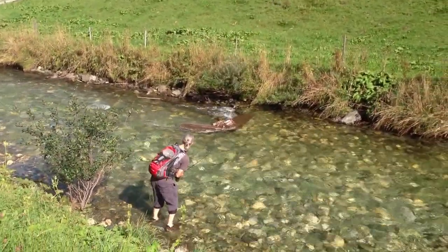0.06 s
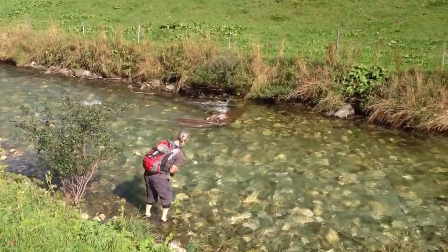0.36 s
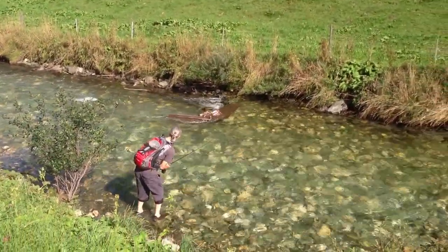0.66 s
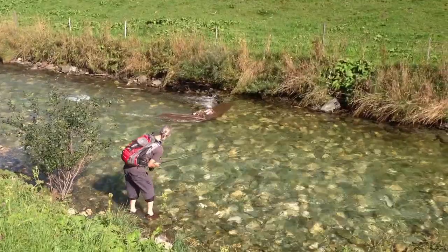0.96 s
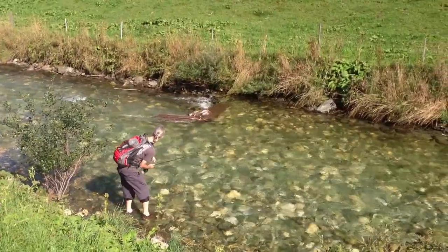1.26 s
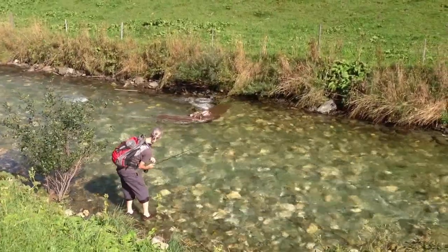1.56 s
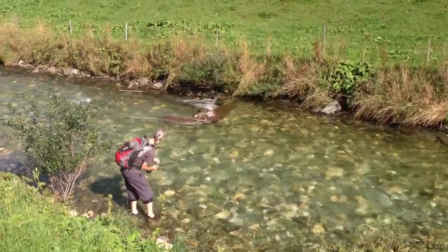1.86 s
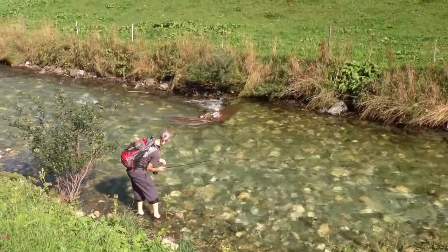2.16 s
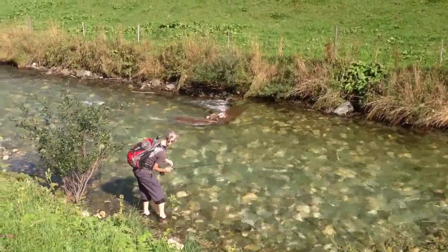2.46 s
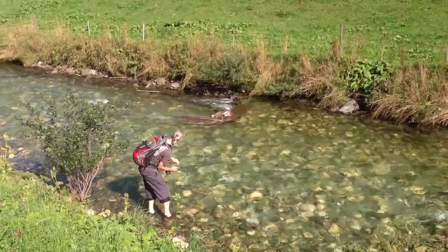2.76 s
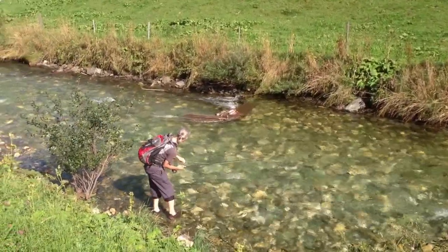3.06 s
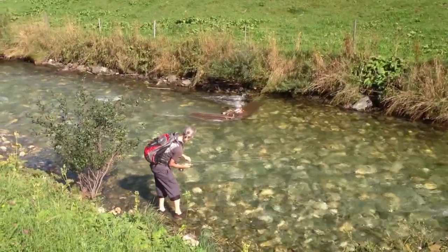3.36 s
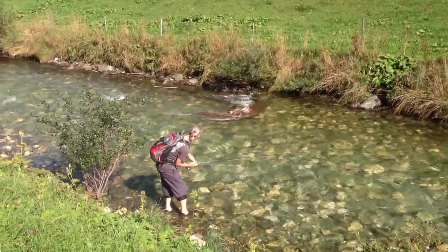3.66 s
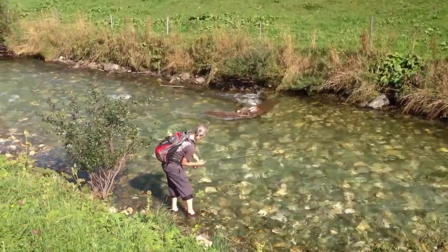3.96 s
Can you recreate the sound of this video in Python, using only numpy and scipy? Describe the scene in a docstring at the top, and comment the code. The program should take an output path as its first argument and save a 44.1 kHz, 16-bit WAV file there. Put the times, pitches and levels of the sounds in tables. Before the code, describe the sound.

A shallow, stony stream rushes steadily outdoors, with small gurgles, plinks and splashes. Just past the middle, the camera on the bank is handled, giving two sharp, close knocks and soft thumps. The water carries on, slightly duller.

```python
"""A shallow, stony stream rushes steadily, with a few gurgles, plinks and small splashes, in mono.
Countless tiny bubbles ring in churning water; the rush slowly dulls and its ringing band sinks.
Just past the middle, a camera on the bank is handled: two sharp knocks and soft thumps of its case.
A few faint ticks on the camera come before and after."""
import sys
import numpy as np
from scipy import signal
from scipy.fft import rfft, irfft
from scipy.io import wavfile

SR = 44100
rng = np.random.default_rng(int(sys.argv[2]) if len(sys.argv) > 2 else 0)


def master_out(mix):
    """Clip the mix to full scale and print it as 16-bit PCM to the path in sys.argv[1]."""
    frames = np.transpose(np.atleast_2d(mix))
    ceiling = np.clip(frames, -1, 1)
    pcm = np.round(ceiling * 32767).astype(np.int16)
    wavfile.write(sys.argv[1], SR, pcm)


N = 176400  # 4 seconds


def stream(wash_db=-4.5, bubbles_db=-8.5, flutter_db=0.38, flutter_s=0.017):
    """Churning water and bubbles flutter together and slowly dull, under a fading high fizz."""
    # three tone colours of the rush (frequency [Hz], level [dB])
    bright = [(20, -39), (50, -39), (75, -27), (113, -16.5), (165, -9), (250, -8), (330, -7), (490, -4.5),
              (720, -0.5), (960, -5), (1300, -3.5), (1900, -5), (2300, -3), (2800, -4.5), (3100, -7.5),
              (3550, -7.5), (4500, -12.5), (4800, -17), (5400, -17), (7200, -27.5), (8500, -29.5),
              (15000, -33.5)]
    mellow = [(20, -37), (70, -30.5), (165, -6), (310, -12.5), (500, -4), (730, -2), (950, -2),
              (1800, -2.5), (2830, -2.5), (3130, -10.5), (3600, -8), (4650, -12), (5900, -23), (8500, -29),
              (15000, -32.5)]
    dull = [(20, -47), (50, -34), (79, -23), (122, -15), (170, -8), (310, -7.5), (520, -4), (700, -1),
            (950, -5), (1700, -1.6), (2300, -1.5), (2600, -6.5), (2850, -3.5), (3130, -10.7), (3650, -10),
            (4400, -14), (5200, -16.5), (6100, -27.5), (8500, -28.5), (15000, -33.5)]
    # the path through them (time [s], stage [0 bright, 1 mellow, 2 dull])
    dulling = [(0, 0.4), (2.05, 0.029), (2.4, 1.05), (2.8, 0.82), (3.2, 1.7), (3.6, 1.9)]
    # loudness of the rush (time [s], level [dB])
    flow = [(0, -43), (.3, -42.5), (.9, -42), (1.4, -42.5), (2.1, -42), (2.45, -42), (2.9, -43),
            (3.12, -41), (3.35, -43.5), (3.5, -41), (3.65, -43), (4, -42)]
    water = amp(wash_db) * wash() + amp(bubbles_db) * bubbles()
    stage = np.clip(curve(dulling), 0, 2)
    rush = np.zeros(N)
    for k, tone in enumerate((bright, mellow, dull)):
        share = np.maximum(1 - abs(stage - k), 0)
        rush += share * tinted(water, tone)
    flutter = flutter_db * drift((N,), flutter_s * SR)
    return unit(ringing_band(rush)) * amp(curve(flow) + flutter) + fizz()


def wash(patch_db=1.48, patch_s=0.035, patch_hz=494, calm_above_hz=12000):
    """Churning water: noise that surges in small patches of time and pitch."""
    hz, t, spectrum = signal.stft(rng.standard_normal(N), SR, nperseg=512)
    patches = drift(spectrum.shape, patch_hz / hz[1], patch_s / t[1])
    stir = 1 / (1 + (hz[:, None] / calm_above_hz) ** 10)  # the highest hiss hardly stirs
    return unit(signal.istft(spectrum * amp(patch_db * patches * stir), SR, nperseg=512)[1][:N])


def bubbles(per_second=2600, low_hz=418.8, high_hz=6610, sizes=48, spread_db=2.5, cycles_to_peak=5.4):
    """Bubbles of many sizes burst at random, most faint and a few strong."""
    out = np.zeros(N)
    for hz in np.geomspace(low_hz, high_hz, sizes):
        born = rng.random(N) < per_second / sizes / SR
        strength = amp(spread_db * np.minimum(rng.exponential(1, N), 4.6))
        ringing = signal.oaconvolve(born * strength, bubble(hz, cycles_to_peak))[:N]
        out += np.sqrt(hz) * unit(ringing)  # high pitches lie further apart, so each gets more
    return unit(out) * np.sqrt(2 * (high_hz - low_hz) / SR)


def bubble(hz, cycles_to_peak, rise=0.09):
    """One bubble swells, rings and dies away, its pitch rising a little."""
    swell_s = cycles_to_peak / hz
    t = np.arange(0, 10 * swell_s, 1 / SR)
    age = t / swell_s  # 1 at the loudest moment
    loudness = (age * np.exp(1 - age)) ** 2
    return loudness * np.sin(2 * np.pi * hz * t * (1 + rise * (age - 2) / 10))


def ringing_band(rush, boost_db=2, width_hz=390):
    """One band of the rush rings a little louder, its pitch slowly sinking."""
    # middle of the band (time [s], pitch [Hz])
    ring_pitch = [(0, 2680), (2.1, 2570), (2.65, 2320), (3.15, 2110), (4, 2130)]
    hz, t, spectrum = signal.stft(rush, SR, nperseg=512)
    away = (hz[:, None] - np.interp(t, *np.transpose(ring_pitch))) / width_hz
    boost = amp(boost_db * np.exp(-(2 * away) ** 2))
    return signal.istft(spectrum * boost, SR, nperseg=512)[1][:N]


def plinks():
    """Single loud bubbles stand out, from low gurgles to high plinks."""
    # bubbles (time [s], pitch [Hz], peak level [dB])
    loud_bubbles = [(0.2255, 3020, -30), (.2352, 2800, -30.5), (.216, 1720, -33.5), (.27, 2650, -31),
                    (.287, 2700, -36), (.277, 344, -46), (0.504, 240, -50.5), (.556, 2500, -35),
                    (0.591, 1350, -38.5), (.69, 670, -43), (0.837, 238, -49.5), (0.892, 194, -50),
                    (1.062, 580, -40), (1.083, 180, -51.5), (1.325, 3620, -35.5), (1.5393, 2570, -31),
                    (1.637, 1170, -37), (1.8507, 2660, -34), (1.887, 7000, -46), (2.0, 5870, -42),
                    (2.2672, 2620, -27), (2.596, 714, -37), (2.762, 4050, -34.5), (2.875, 159, -52.5),
                    (3.3235, 2180, -32), (3.412, 250, -49), (3.4835, 2080, -31.5), (3.7892, 1610, -30.5)]
    out = np.zeros(N)
    for s, hz, db in loud_bubbles:
        add(out, s, amp(db) * bubble(hz, cycles_to_peak=3))
    return out


def splashes():
    """Small splashes, each a short puff of noise."""
    # splashes (time [s], length [s], level [dB])
    puffs = [(0.147, 0.0076, -44), (0.264, 0.011, -45), (0.284, 0.011, -46), (0.87, 0.02, -41.5),
             (2.582, 0.016, -43), (3.502, 0.015, -45)]
    # their tone colour (frequency [Hz], level [dB])
    splash_tone = [(300, -24), (900, -5), (1700, -14), (2700, 4), (4000, -6.5), (6800, -17.5), (8500, -34),
                   (15000, -42)]
    spray = tinted(rng.standard_normal(N), splash_tone)
    out = np.zeros(N)
    for s, length, db in puffs:
        n = round(length * SR)
        add(out, s, amp(db) * np.sqrt(np.hanning(n)) * spray[round(s * SR):][:n])
    return out


def handling(lowest_hz=101):
    """A hand knocks the camera, and its case thumps softly as the grip shifts."""
    # knocks and ticks (time [s], level [dB], treble edge [Hz], rattle [dB], ring of the case [dB])
    contacts = [(.2355, -18, 7260, -3, -1), (.3375, -32, 9500, 0, 6), (2.2477, -4.5, 5030, -15, -3),
                (2.2993, -3, 8250, -18, 3), (2.5193, -34, 14500, -6, -2), (2.5745, -30.5, 14000, 2, 3),
                (2.6032, -31, 7800, 2, 0), (3.588, -32, 8950, -1, 2)]
    # thumps (time [s], length [s], first pitch [Hz], last pitch [Hz], level [dB])
    grip_shifts = [(2.248, 0.013, 553, 482, -31.5), (2.249, 0.0096, 362, 340, -37),
                   (2.2555, 0.0095, 300, 214, -29), (2.262, 0.026, 187, 136, -47),
                   (2.304, 0.0184, 220, 180, -46.5)]
    knocks, thumps = np.zeros((2, N))
    for s, db, edge_hz, rattle_db, ring_db in contacts:
        add(knocks, s, amp(db) * signal.fftconvolve(knock(edge_hz, ring_db), rattle(rattle_db)))
    for s, length, first_hz, last_hz, db in grip_shifts:
        add(thumps, s, amp(db) * thump(length, first_hz, last_hz))
    small_case = signal.butter(3, lowest_hz, "highpass", fs=SR, output="sos")  # passes little deep bass
    return knocks + signal.sosfilt(small_case, thumps)


def knock(edge_hz, ring_db, edge_floor_db=-7.5, lag_s=0.001026, lag_below_hz=7000, size=2048):
    """A dry click, dull above edge_hz, with a very short ring of the case."""
    # tone colour of the click (frequency [Hz], level [dB])
    click_tone = [(30, -45), (100, -28), (250, -15), (700, -9), (1500, -2), (2600, -6), (4000, -3),
                  (7500, 0), (10000, -1.5), (14000, -7), (15500, -20)]
    # notes of the case (pitch [Hz], level [dB], time to fade by 60 dB [s])
    case_notes = [(700, -26.5, 0.011), (960, -20, 0.005)]
    hz, t = abs(np.fft.fftfreq(size, 1 / SR)), np.arange(size) / SR
    above = hz / edge_hz
    treble_cut = 1 / (1 + above ** 40) + amp(edge_floor_db) / (1 + above ** 2)
    gain = amp(colour(click_tone, hz)) * treble_cut
    # the most sudden click that has this tone colour
    click = np.fft.ifft(np.exp(np.conj(signal.hilbert(np.log(gain))))).real
    ring = sum(amp(ring_db + db - 60 * t / fade_s) * np.cos(2 * np.pi * f * t)
               for f, db, fade_s in case_notes)
    blow = click + signal.lfilter(*signal.butter(2, [350, 1150], "bandpass", fs=SR), ring)
    # in the case, lower pitches arrive just after the treble
    lag = 2 * np.pi * lag_s * lag_below_hz * np.tanh(np.fft.rfftfreq(size, 1 / SR) / lag_below_hz)
    return irfft(rfft(blow) * np.exp(-1j * lag))


def rattle(db, rise_s=0.00064, fade_s=0.0088):
    """One contact, then a brief chatter of loose parts."""
    t = np.arange(0, fade_s, 1 / SR)
    chatter = rng.standard_normal(len(t)) * (1 - np.exp(-t / rise_s)) * amp(-60 * t / fade_s)
    return (t == 0) + amp(db) * chatter / np.linalg.norm(chatter)


def thump(length, first_hz, last_hz, roughness=0.19, grain_s=0.0023):
    """A soft, rough thud whose pitch sinks as the grip eases."""
    n = round(length * SR)
    cycles = np.cumsum(np.geomspace(first_hz, last_hz, n)) / SR
    rough = 1 + roughness * drift((n,), grain_s * SR)
    return np.sqrt(np.hanning(n)) * rough * np.sin(2 * np.pi * cycles)


def fizz():
    """A faint, high fizz of churning water fades away behind the rush."""
    # its tone colour (frequency [Hz], level [dB])
    fizz_tone = [(2000, -23), (3200, -2), (5000, 3), (6800, -3), (7800, -7), (9000, -10), (11000, -17),
                 (15000, -26)]
    # its loudness (time [s], level [dB])
    fizz_level = [(0, -54.5), (.23, -56.5), (.36, -64), (.7, -64), (2.2, -65), (2.6, -72), (3, -83),
                  (4, -86)]
    return tinted(wash(), fizz_tone) * amp(curve(fizz_level))


def amp(db):
    """Turns decibels into a number to multiply by."""
    return 10 ** (np.asarray(db) / 20)


def unit(x):
    """Scales x to an average strength (rms) of 1."""
    return x / np.sqrt(np.mean(x ** 2) + 1e-20)


def colour(points, hz):
    """Reads a tone colour's level in dB at each frequency."""
    f, db = np.transpose(points)
    return np.interp(np.log(hz + 1), np.log(f + 1), db)


def curve(points):
    """Joins (time, value) points with straight lines."""
    return np.interp(np.arange(N) / SR, *np.transpose(points))


def tinted(x, points):
    """Gives x a tone colour, at strength 1."""
    gain = amp(colour(points, np.fft.rfftfreq(len(x), 1 / SR)))
    return unit(irfft(rfft(x) * gain, len(x)))


def add(mix, s, sound):
    """Mixes a sound in at s seconds."""
    part = mix[round(s * SR):][:len(sound)]
    part += sound[:len(part)]


def drift(shape, *spans):
    """Smooth random wandering; each span says how many steps stay alike along one axis."""
    spectrum = np.fft.fftn(rng.standard_normal(shape))
    for f, span in zip(np.meshgrid(*map(np.fft.fftfreq, shape), indexing="ij"), spans):
        spectrum /= 1 + (np.pi * f * span / 2) ** 2
    return unit(np.fft.ifftn(spectrum).real)


def scene():
    """The water and the handled camera, the same in both channels."""
    return np.tile(stream() + plinks() + splashes() + handling(), (2, 1))


def record(dry):
    """Cuts away the very highest treble, above 15400 Hz."""
    taps = signal.firwin(601, 15400, window=("kaiser", 8), fs=SR)
    return signal.oaconvolve(dry, taps[None], "same")


dry = scene()
out = record(dry)
master_out(out)
```